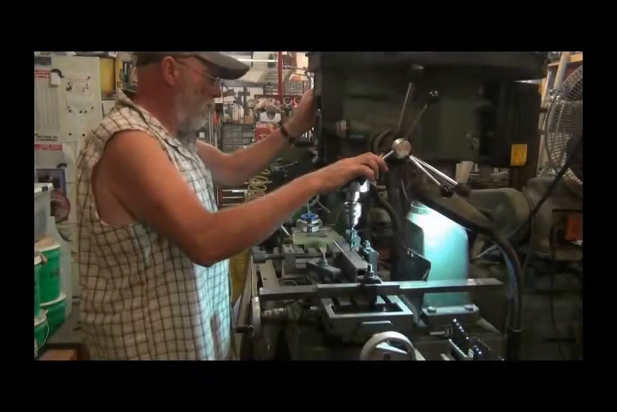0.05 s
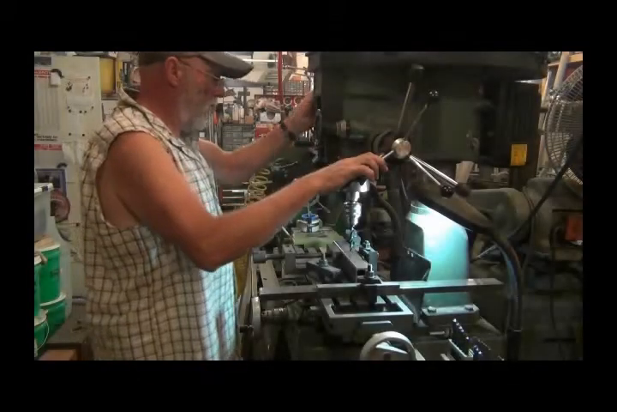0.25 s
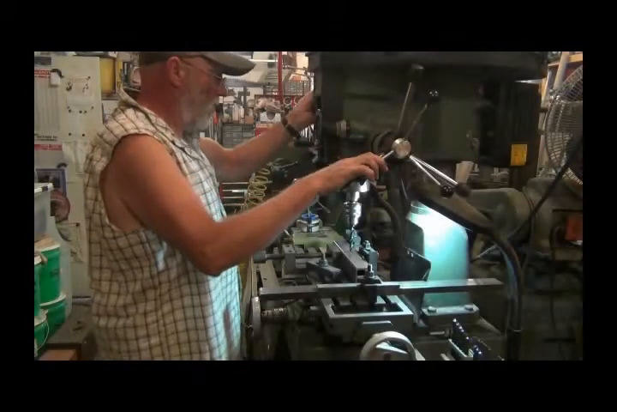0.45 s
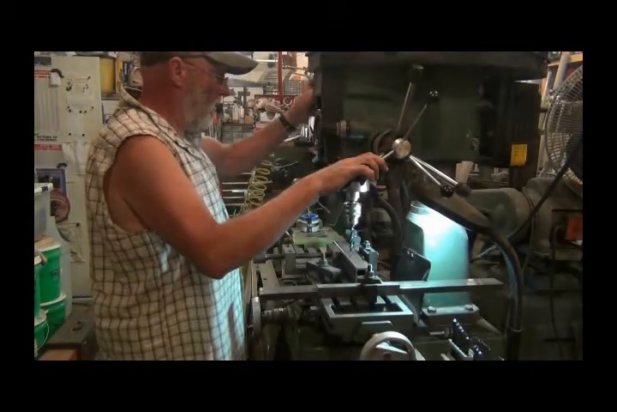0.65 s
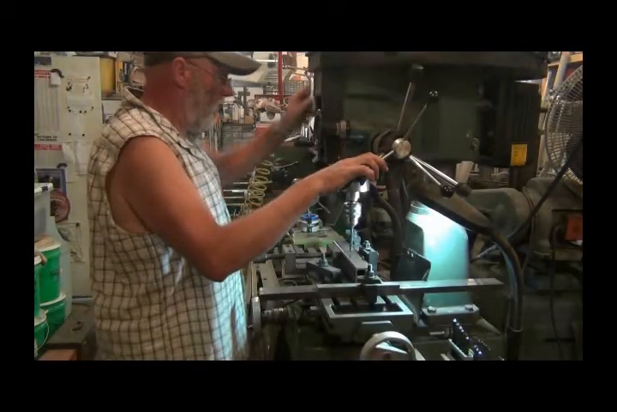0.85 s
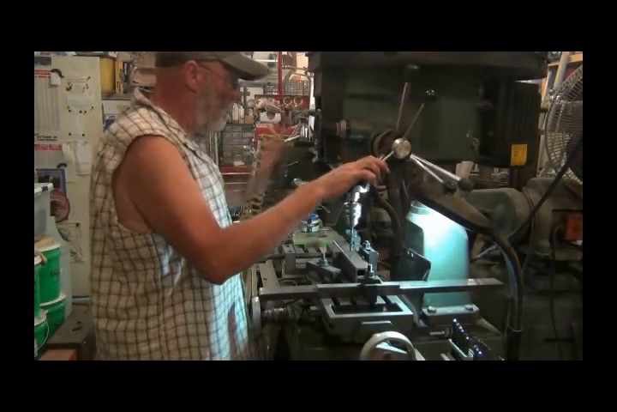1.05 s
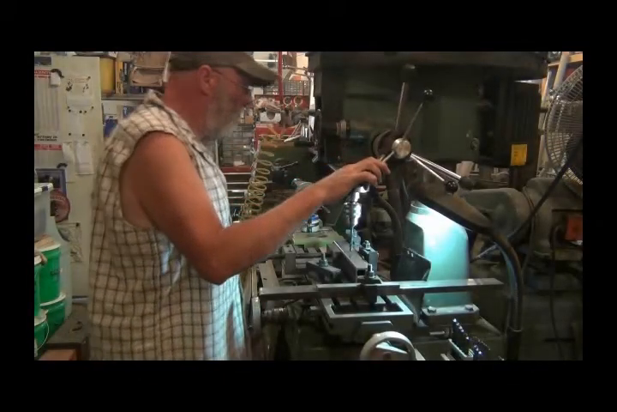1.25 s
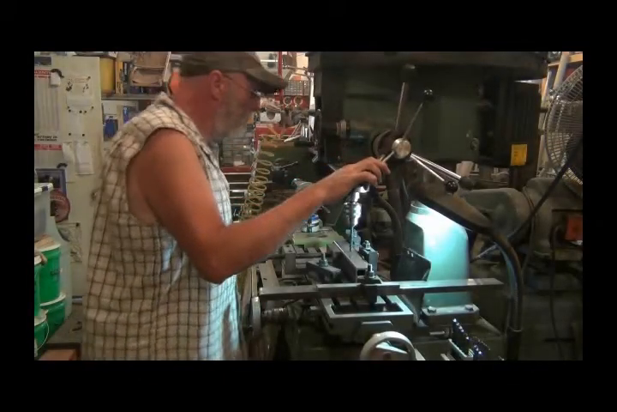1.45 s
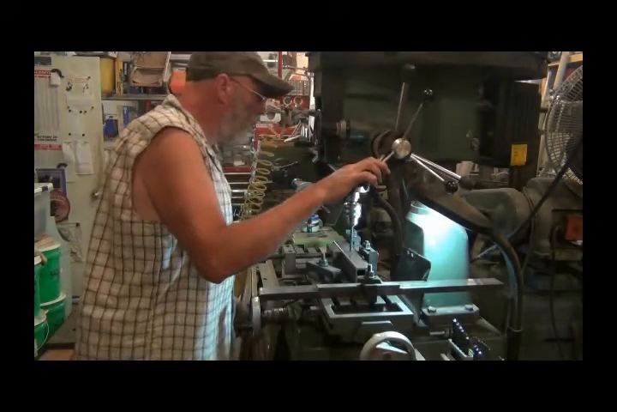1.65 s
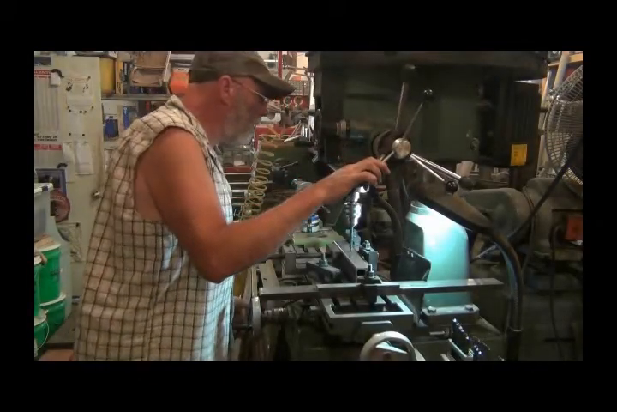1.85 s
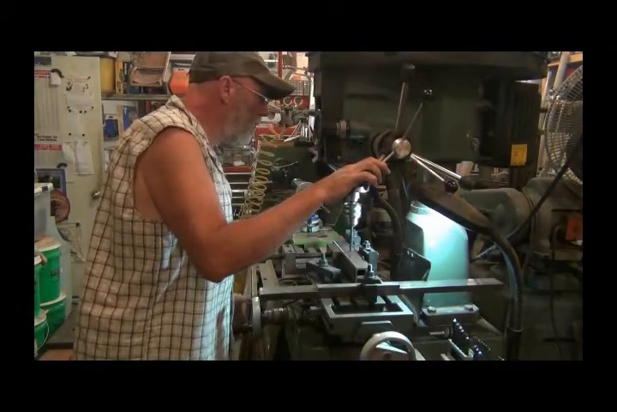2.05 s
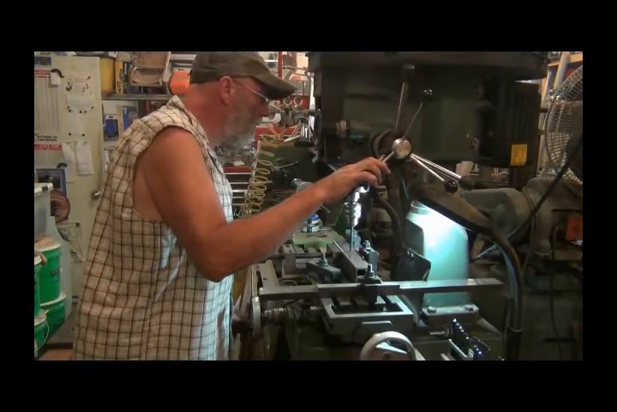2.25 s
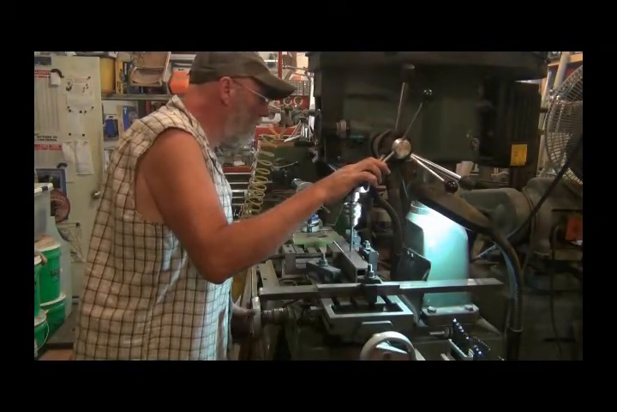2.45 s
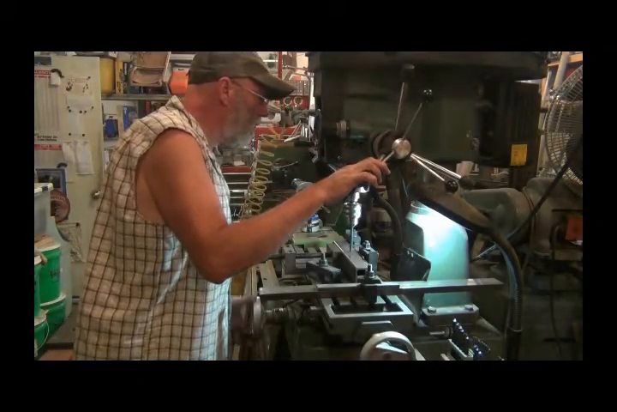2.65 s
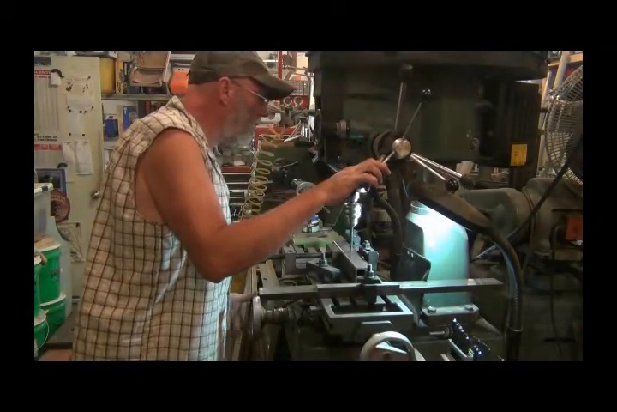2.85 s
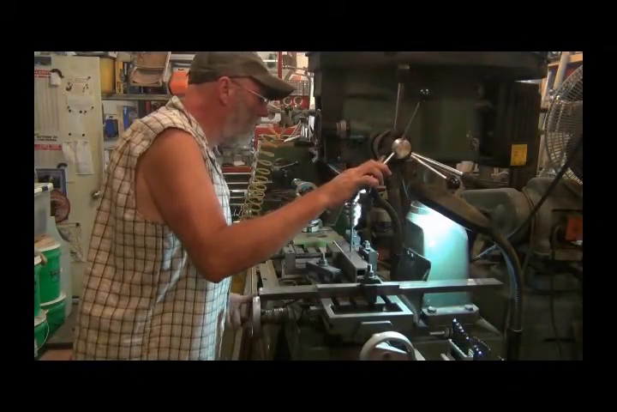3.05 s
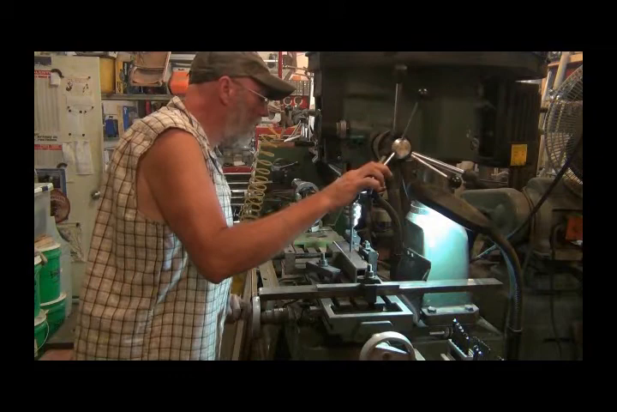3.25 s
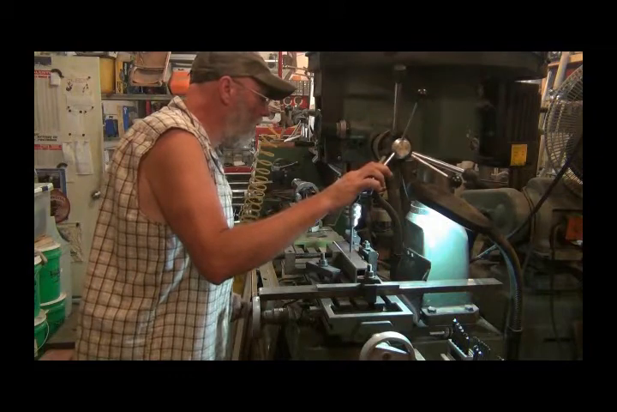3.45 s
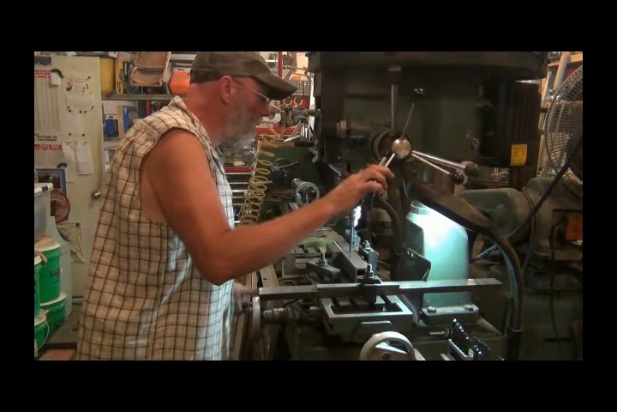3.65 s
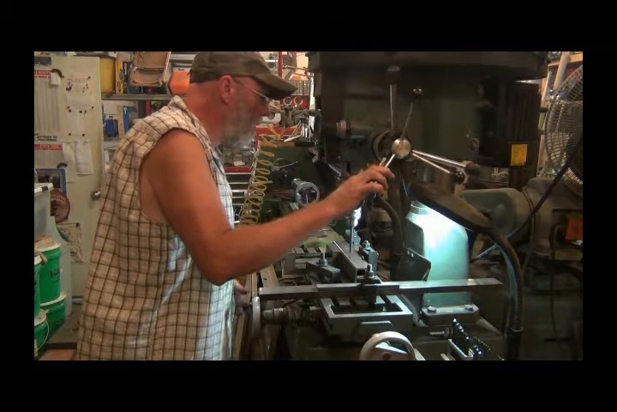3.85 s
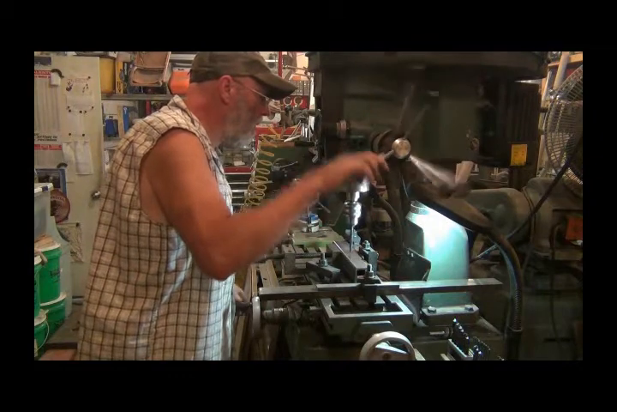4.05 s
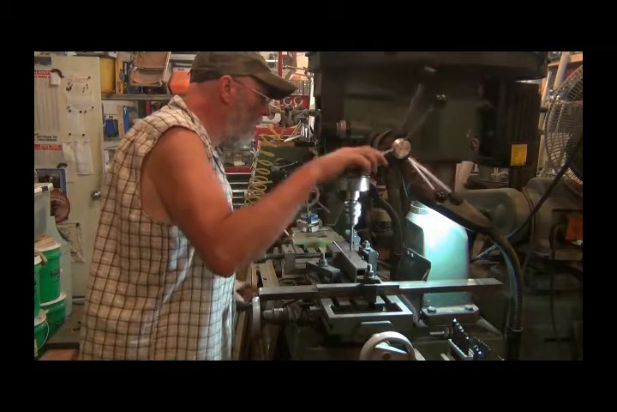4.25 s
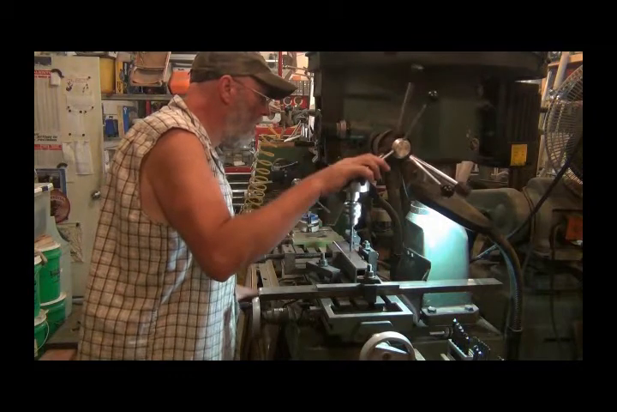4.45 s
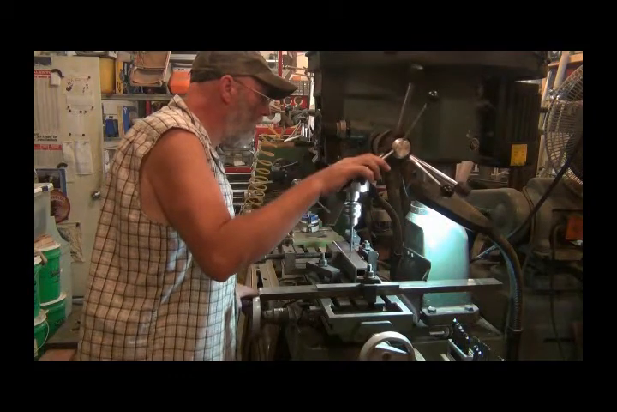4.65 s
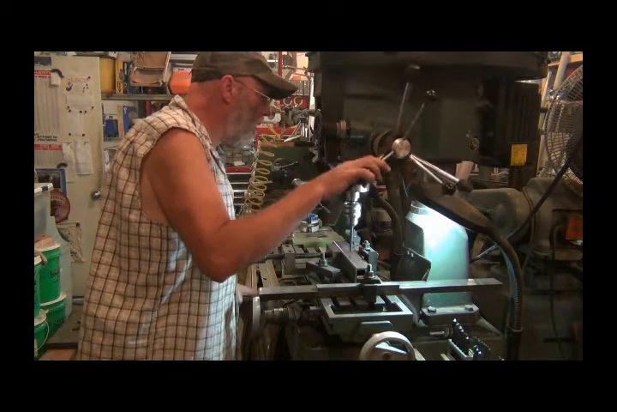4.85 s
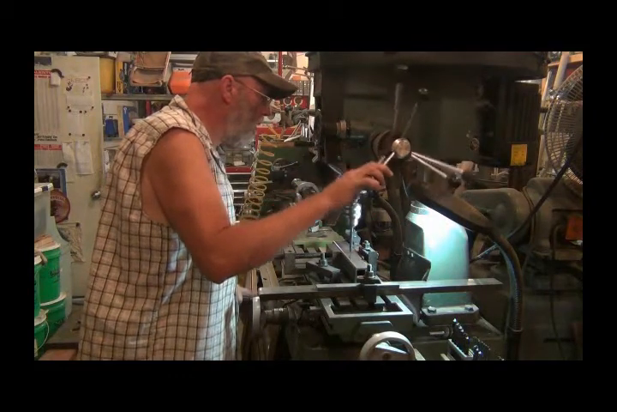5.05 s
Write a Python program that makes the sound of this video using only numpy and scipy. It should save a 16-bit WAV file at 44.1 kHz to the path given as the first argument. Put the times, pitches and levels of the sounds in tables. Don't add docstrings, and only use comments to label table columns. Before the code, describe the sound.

After quiet workshop air and small lever scrapes, a switch snaps and a drilling machine spins up into a steady, humming, rattling metallic run.

```python
import sys
import numpy as np
from scipy import signal
from scipy.fft import rfft, irfft
from scipy.io import wavfile
from scipy.ndimage import uniform_filter1d

SR = 44100
rng = np.random.default_rng(int(sys.argv[2]) if len(sys.argv) > 2 else 0)


def convert_level_to_amplitude(level_db):
    exponent = np.asarray(level_db, float) / 20
    return 10 ** exponent


def bounce(signal):
    frames = np.transpose(np.atleast_2d(signal))
    limited = np.clip(frames, -1, 1)
    pcm = np.round(limited * 32767).astype(np.int16)
    wavfile.write(sys.argv[1], SR, pcm)


N = 225703
T = np.arange(N) / SR
SWITCH_ON_S = 0.7105


def level(x, db):
    return x * convert_level_to_amplitude(db) / np.sqrt(np.mean(x ** 2))


def noise():
    return rng.standard_normal(N)


def colour(x, points):
    hz, db = np.transpose(points)
    grid_hz = np.maximum(np.fft.rfftfreq(8192, 1 / SR), 1)
    log_gain = np.interp(np.log(grid_hz), np.log(hz), db) * np.log(10) / 20
    ceps = irfft(log_gain)
    ceps[1:4096] *= 2
    ceps[4097:] = 0
    response = irfft(np.exp(rfft(ceps)))
    return signal.fftconvolve(x, response)[:N]


def ring(x, modes):
    out = 0
    for k, (hz, width_hz, db) in enumerate(modes):
        b, a = signal.iirpeak(hz, hz / width_hz, SR)
        out = out + (-1) ** k * convert_level_to_amplitude(db) * signal.lfilter(b, a, x)
    return out


def walk(rate):
    hold = int(SR / rate)
    held = np.repeat(rng.standard_normal(N // hold + 1), hold)
    return 2.7 * uniform_filter1d(uniform_filter1d(held, hold), hold)[:N]


def grains(rate, spread_db):
    sign = rng.choice([-1, 1], N)
    size = sign * convert_level_to_amplitude(spread_db * np.minimum(rng.exponential(size=N), 3))
    return level((rng.random(N) < rate / SR) * size, 0)


def burst(t0, rise_s, t60_s):
    out, start = np.zeros(N), int(t0 * SR)
    age = T[:SR // 2][:N - start]
    out[start:start + len(age)] = (1 - np.exp(-age / rise_s)) * np.exp(-np.log(1000) * age / t60_s)
    return out


def spell(start, hold_s, db, rise_db_s, fall_db_s):
    before_s = np.maximum(start - T, 0)
    after_s = np.maximum(T - start - hold_s, 0)
    return convert_level_to_amplitude(db - rise_db_s * before_s - fall_db_s * after_s)


def shop():
    # frequency in Hz, spectral level in dB per Hz.
    air_tint = [(24, -45), (40, -23), (124, 7.5), (975, 7.5), (1540, 3), (1820, 1.5), (3010, -3.5),
                (7320, -6.5), (10000, -8), (11300, -7), (12400, -9), (16100, -37), (22000, -120)]
    air = level(colour(noise(), air_tint), -55.5)
    lamp = np.sqrt(2) * convert_level_to_amplitude(-70) * np.sin(2 * np.pi * 119.8 * T)
    return air + lamp


def echo(x, db):
    room_t60_s = 0.33
    tail = (noise() * burst(0.0033, 0.0016, room_t60_s))[:SR // 2]
    tail = tail / np.sqrt(np.sum(tail ** 2))
    return convert_level_to_amplitude(db) * signal.fftconvolve(x, tail)[:N]


def lever():
    # frequency in Hz, width in Hz, level in dB.
    box_modes = [(674, 34, 3), (840, 48, -1), (1014, 65, 1), (1188, 17, 2.5), (1420, 130, -6.5),
                 (1550, 36, -20)]
    # start in seconds, hold in seconds, level in dB, brightness in dB.
    strokes = [
        (-.03, 0.033, -40.5, -28),
        (0.242, 0.033, -54, -7.5),
        (0.436, 0.054, -41.5, -31),
    ]
    slip = grains(2500, 1.0)
    box = level(ring(ring(slip, box_modes), [(1100, 1700, 0)]), 0)
    edge = level(ring(slip, [(2280, 1000, 0)]), 0)
    out = 0
    for t0, hold_s, db, bright_db in strokes:
        out = out + spell(t0, hold_s, db, 500, 150) * (box + convert_level_to_amplitude(bright_db) * edge)
    return out


def snaps(blows, bright_db):
    out, rough = 0, convert_level_to_amplitude(1.2 * walk(90))
    wobble_s = 6e-5 * walk(300)
    for t0, db, hz, ring_db, t60_s in blows:
        crack = level(ring(noise(), [(1440, 780, 0), (7100, 5000, bright_db)]), 0)
        crack = crack * burst(t0, 0.0013, t60_s)
        tone = rough * np.sin(2 * np.pi * hz * (T - t0 + wobble_s)) * burst(t0, 3 / hz, t60_s)
        out = out + convert_level_to_amplitude(db) * (crack + convert_level_to_amplitude(ring_db) * tone)
    return out


def relay_and_knocks():
    # start in seconds, level in dB, ring in Hz, ring level in dB, t60 in seconds.
    blows = [(.2065, -48.5, 2600, 0, 0.058), (.209, -57, 1255, 6, .25), (.211, -61, 1860, 8, .2),
             (.392, -65.5, 1115, 19, .4), (.7095, -33.5, 1176, 10, 0.087), (.735, -37.5, 886, 5, 0.17),
             (.888, -43, 534, 18, .15), (.7115, -42, 5080, 3, 0.5), (.722, -39, 1400, 3, 0.19),
             (.742, -37.5, 600, 18, .1), (.762, -41.5, 578, 23.5, 0.13), (.8, -42, 1010, 12, 0.27),
             (.834, -37.5, 687, 18, 0.29), (.914, -32, 1230, 0, 0.59), (3.015, -38, 483, 15, 0.22),
             (3.03, -39, 545, 22, 0.19), (3.05, -41.5, 696, 18, 0.18)]
    return snaps(blows, -8.5)


def starting_switch():
    # start in seconds, level in dB, ring in Hz, ring level in dB, t60 in seconds.
    clacks = [
        (.8735, -28, 4690, 6.2, 0.14),
        (.881, -25, 2600, 0.98, 0.14),
        (.886, -21, 5280, 1.1, 0.19),
        (.892, -26, 1390, 1.2, 0.12),
    ]
    return snaps(clacks, 27)


def windings(db):
    # time in seconds, hum level in dB against steady running.
    spin_up = [
        (.73, -30),
        (.76, -15),
        (.86, -13),
        (.95, 4),
        (1.02, -11),
        (1.06, 0.5),
        (1.11, -4.5),
        (1.35, -1.5),
        (1.6, -0.8),
    ]
    hum_hz, lead_rad, pan_db = 240, -0.59, -2.5
    s, rel_db = np.transpose(spin_up)
    gain_db = db + np.interp(T, s, rel_db, left=-90) + 0.34 * walk(11.0)
    half = np.array([[0.5], [-0.5]])
    phase = 2 * np.pi * hum_hz * T + lead_rad * half + 0.028 * walk(5.3)
    return np.sqrt(2) * convert_level_to_amplitude(gain_db) * convert_level_to_amplitude(pan_db * half) * np.sin(phase)


def head(rumble_db, mesh_db):
    # frequency in Hz, level in dB.
    shaft_lines = [(103, -57.5), (120, -51), (154.5, -49), (188.5, -48.5), (292.9, -45), (426, -53),
                   (523.5, -45), (583.5, -51.5), (689, -54)]
    # frequency in Hz, spectral level in dB per Hz.
    casting_tint = [(50, -39.5), (90, -23), (140, -29.5), (200, -6.5), (225, 4), (255, -6), (310, -1),
                    (350, -9), (520, -6.5), (650, -7), (1000, -13.5), (1400, -43.5)]
    # frequency in Hz, width in Hz, level in dB.
    panel_modes = [(184, 40, -4.5), (304.5, 54, -6.5), (437.5, 40, -4), (581, 32, -4.5), (697, 17, -12)]
    # frequency in Hz, spectral level in dB per Hz.
    mesh_tint = [(410, -36), (700, -1.5), (988, -4.5), (1280, -3), (1370, -5.5), (1910, -5.5), (2090, -10),
                 (2870, -6.5), (3480, -19), (4200, -18.5), (5460, -25), (9240, -120)]
    # frequency in Hz, width in Hz, level in dB.
    gear_modes = [(1263, 107, 13.5), (1600, 210, 3), (2600, 26, 17.5), (3020, 31, -13)]
    shake = grains(1500, 1.9) * convert_level_to_amplitude(1.5 * walk(12))
    casting = level(colour(noise(), casting_tint), 3.5) + level(ring(shake, panel_modes), 0.07)
    lines = 0
    for hz, db in shaft_lines:
        gain = np.sqrt(2) * convert_level_to_amplitude(db + 1.15 * walk(4.86))
        lines = lines + gain * np.sin(2 * np.pi * hz * T + 0.85 * walk(4))
    teeth = grains(5000, 1.2) * convert_level_to_amplitude(0.32 * walk(24.85))
    mesh = level(colour(teeth, mesh_tint), -1.01) + level(ring(teeth, gear_modes), -12)
    lines_in = np.clip((T - 0.8) / 0.18, 0, 1)
    return convert_level_to_amplitude(rumble_db) * casting + convert_level_to_amplitude(mesh_db) * mesh + lines * lines_in


def knock_rows():
    # start in seconds, turns, peak level in dB.
    runs = [(.997, 1, -20.5), (1.059, 2, -18.5), (1.198, 1, -22.5), (1.289, 3, -25), (1.489, 2, -17.5),
            (1.629, 2, -17), (1.7485, 5, -15), (2.042, 2, -21), (2.159, 1, -11.5), (2.278, 1, -19.5),
            (2.44, 2, -16.5), (2.6146, 2, -17), (2.733, 1, -14), (2.849, 3, -15.5), (3.027, 2, -25),
            (3.142, 2, -21), (3.282, 2, -19.5), (3.456, 1, -19), (3.54, 1, -19), (3.598, 2, -18),
            (3.772, 3, -15), (3.948, 2, -18.5), (4.0653, 1, -13), (4.153, 1, -20), (4.267, 2, -20),
            (4.441, 1, -13), (4.585, 2, -18.5), (4.698, 1, -12.5), (4.758, 2, -17), (4.875, 3, -21),
            (5.1, 1, -21)]
    turn_s, half_turn_db = 0.0586, -13
    jitter_s, scatter_db = 0.0015, 0.8
    rows = []
    for start, turns, db in runs:
        for k in range(round(turns)):
            for half in (0, 0.5):
                rows.append((start + (k + half) * turn_s, db + 2 * half * half_turn_db))
    rows = np.array(rows)
    rows = rows + rng.standard_normal(rows.shape) * (jitter_s, scatter_db)
    return rows[rows[:, 0] < T[-1]]


def cover(rattle):
    # start in seconds, hold in seconds, level in dB.
    buzzes = [(0.893, .02, -27), (1.46, 0.55, -31), (2.1, 0.062, -36), (2.53, .1, -37),
              (2.728, 0.14, -28.5), (3.032, .04, -32), (3.23, 0.029, -28), (3.443, 0.082, -29),
              (3.787, .4, -38), (4.42, .07, -35.5), (4.594, .25, -32), (5.0, .03, -27)]
    thumps = sum(convert_level_to_amplitude(db + 23) * burst(t0, 0.006, 0.047) for t0, db in rattle)
    slap = (0.3 + thumps) * noise()
    spells = sum(spell(*row, 200, 200) for row in buzzes)
    return spells * level(ring(ring(slap, [(524, 45, 0)]), [(526, 90, 0)]), -3.5)


def spindle(hiss_db, rattle):
    # frequency in Hz, spectral level in dB per Hz.
    hiss_tint = [(2200, -15), (3200, 1.5), (4000, -0.5), (4600, -1.5), (5400, 3), (6100, -3), (7500, 1),
                 (9200, -5.5), (11000, -8.5), (12400, -8.5), (13500, -43.5)]
    # frequency in Hz, width in Hz, level in dB.
    quill_modes = [(4576, 230, 2.5), (5380, 310, 2.5), (5320, 70, 0.5), (6870, 1000, -0.5), (7830, 83, -26),
                   (9200, 250, -4.5)]

    def quill(x):
        return level(colour(x, hiss_tint), 0.48) + level(ring(x, quill_modes), -6.5)

    knock, top = 0, 0
    for t0, db in rattle:
        shape = burst(t0 - 0.004, 0.0063, 0.1)
        top_db = db - 9 + 0.12 * (db + 15)
        knock = knock + convert_level_to_amplitude(db) * shape
        top = top + convert_level_to_amplitude(top_db) * shape
    chatter = grains(6000, 2.5)
    low = ring(quill(chatter), [(4950, 16000, 0)])
    high = level(ring(ring(chatter, [(10300, 1540, 0)]), [(11100, 2400, 0)]), 0)
    thud = level(ring(chatter, [(1500, 520, 0)]), 0)
    steady = ring(quill(noise()), [(4430, 12300, 0.011)])
    hiss = convert_level_to_amplitude(hiss_db + 0.3 * walk(14)) * steady
    return hiss + convert_level_to_amplitude(-8.0) * knock * low + convert_level_to_amplitude(-5.5) * top * high + convert_level_to_amplitude(-13.0) * knock * thud


def scene():
    # time in seconds, load in dB against steady running.
    load = [(.705, -6), (.735, 2), (.81, -3.5), (.9, 3.5), (.99, -1.5), (1.3, -1.5), (1.75, 2), (2.27, 0),
            (2.47, 0.5), (2.85, -0.35), (3.1, 0.4), (3.8, -0.6), (4.1, .8), (4.4, 1.2), (4.53, -1),
            (4.8, 2.2), (5.04, -1.5), (5.12, -0.5)]
    load_db = np.interp(T, *np.transpose(load), left=-120)
    rattle = knock_rows()
    since_on_s = T - SWITCH_ON_S
    running = np.clip(since_on_s / 0.0045, 0, 1)
    hum_db = -25.6 + 0.078 * load_db
    rumble_db = -34.5 + 0.7 * load_db - 30 * np.exp(-np.maximum(since_on_s, 0) / 0.024)
    mesh_db = -30 + 0.96 * load_db
    slow = np.clip((0.9 - T) / 0.1, 0, 1)
    hiss_db = -36.5 + 1.05 * load_db - 11 * slow
    drive = head(rumble_db, mesh_db) + cover(rattle) + spindle(hiss_db, rattle)
    dry = lever() + relay_and_knocks() + starting_switch() + running * drive
    mid = dry + echo(dry, -11.5) + shop()
    side = echo(dry + shop(), -10) - 0.072 * ring(mid, [(600, 1700, 0)])
    return mid + side * np.array([[1], [-1]]) + windings(hum_db)


def band_limit(x):
    return signal.sosfilt(signal.butter(12, 12570, fs=SR, output="sos"), x)


def record(dry):
    mix = signal.sosfilt(signal.butter(3, 83.5, "high", fs=SR, output="sos"), dry)
    drift = np.array([ring(noise(), [(30, 60, 0)]) for _ in range(2)])
    mix = mix + 20 * convert_level_to_amplitude(-82) * drift
    return band_limit(mix)


dry = scene()
out = record(dry)
bounce(out)
```